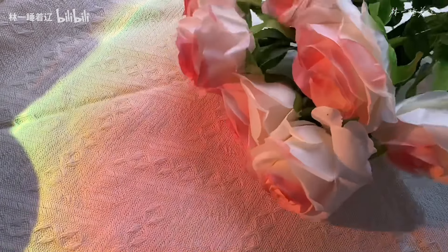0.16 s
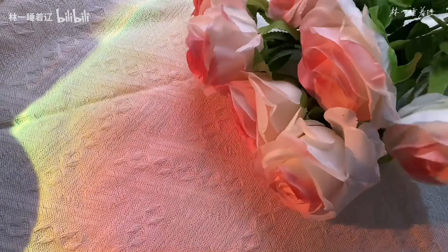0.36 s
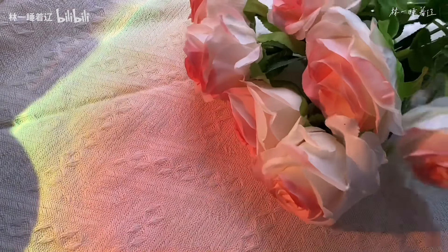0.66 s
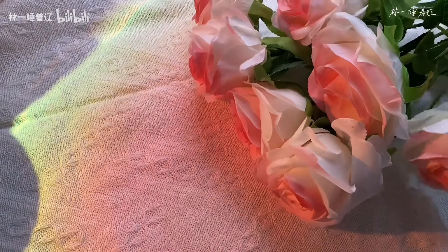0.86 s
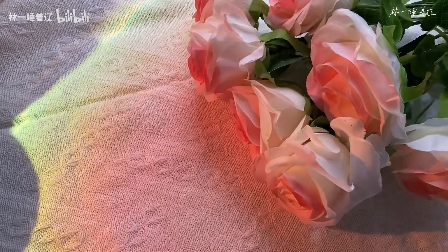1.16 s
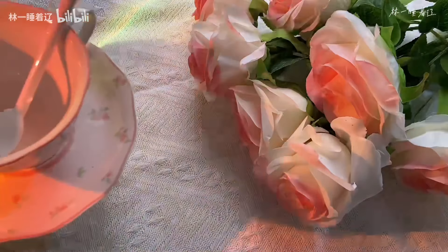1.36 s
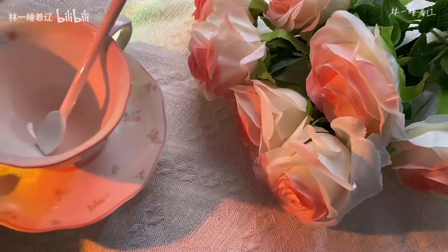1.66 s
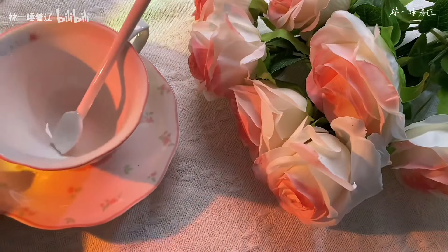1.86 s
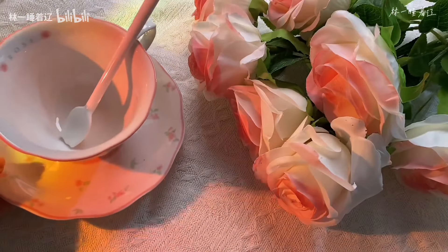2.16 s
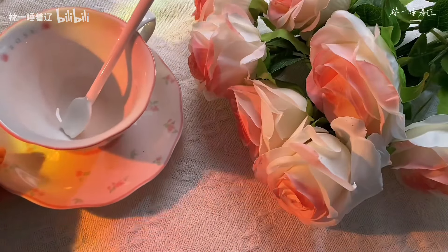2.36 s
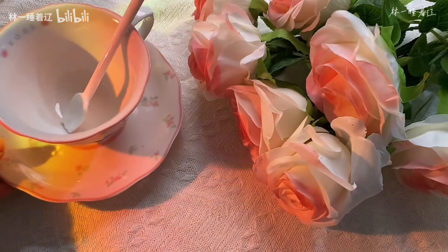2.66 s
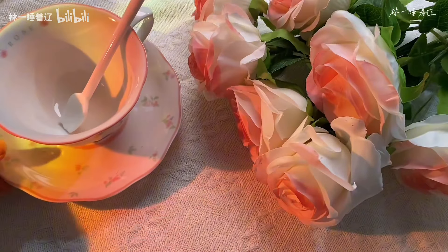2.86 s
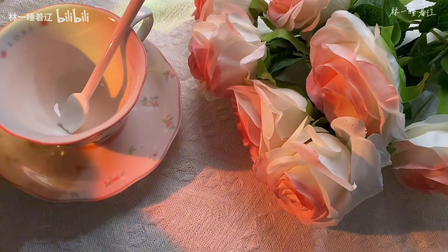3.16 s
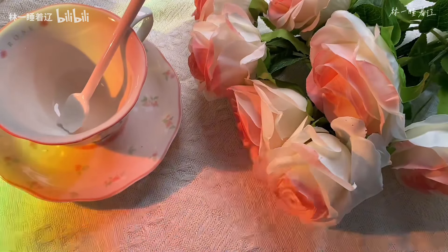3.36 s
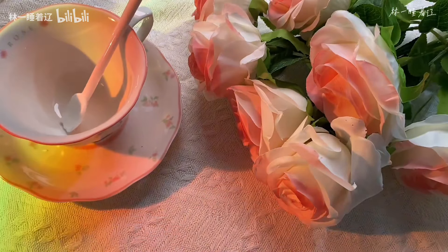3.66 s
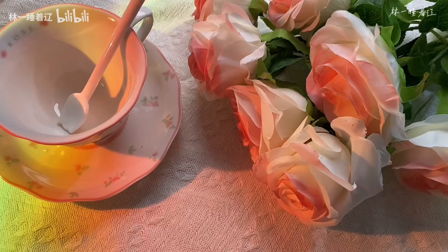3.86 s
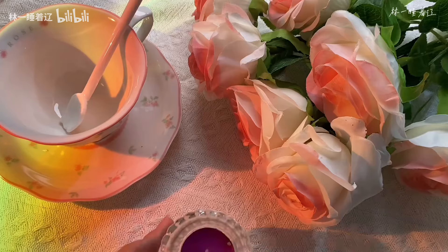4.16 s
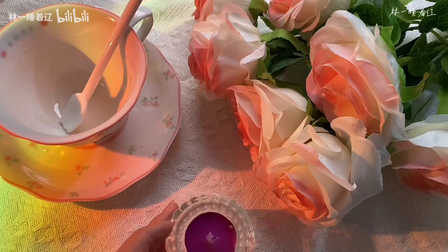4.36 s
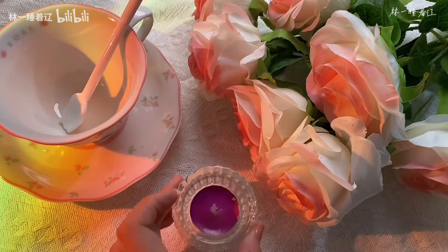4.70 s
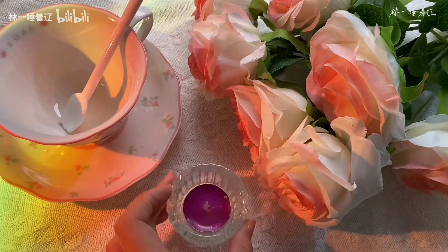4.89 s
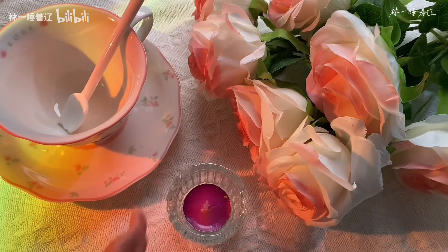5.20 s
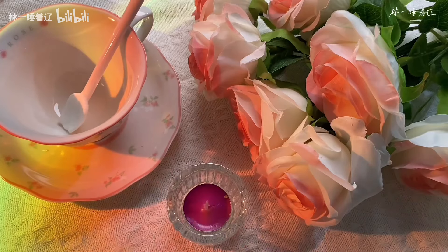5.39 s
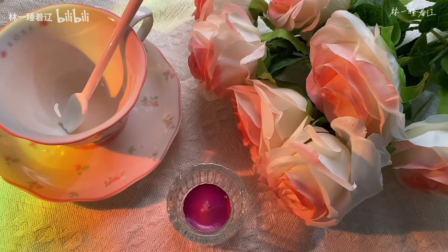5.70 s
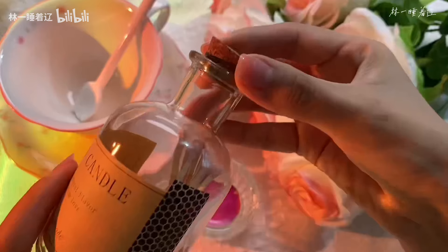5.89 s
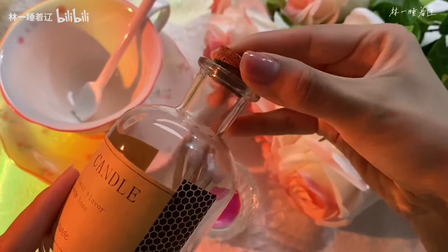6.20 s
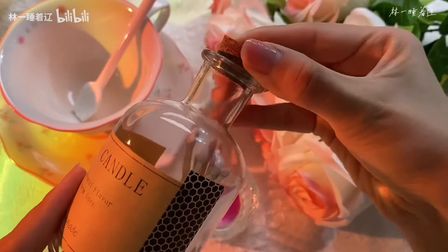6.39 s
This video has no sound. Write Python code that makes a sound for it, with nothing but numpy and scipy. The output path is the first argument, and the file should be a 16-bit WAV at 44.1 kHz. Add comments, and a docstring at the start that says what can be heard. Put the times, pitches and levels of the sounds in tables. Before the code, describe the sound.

Close to a cloth-covered table in a small quiet room, artificial roses rustle and crackle with stem snaps and soft bumps. A china saucer knocks down twice, scrapes faintly, then the cup drops sharply, rings and rattles to rest. After a pause a thick glass candle holder lands with two knocks. A fingertip thuds, a spoon tinks faintly, and soft background hiss rises at the end.

```python
"""Laying a tea table

Artificial roses rustle across a cloth, a china cup and saucer clink and rock to rest, a glass candle holder
knocks down and a fingertip taps. Blows ring banks of decaying sines, with noise bursts as their cracks;
rustle, scrapes and skids are shaped noise. The table booms under the heavier blows. The level dips briefly
four times; after the last dip the noise floor is louder and fingers rub softly on a bottle."""
import sys
import numpy as np
from scipy import signal
from scipy.fft import rfft, irfft, next_fast_len
from scipy.io import wavfile
from scipy.ndimage import uniform_filter1d, map_coordinates

SR = 44100
rng = np.random.default_rng(int(sys.argv[2]) if len(sys.argv) > 2 else 0)


def dump_mix(stems):
    """Bounce the given channels to the path in sys.argv[1] as a 16-bit WAV at rate SR."""
    frames = np.atleast_2d(stems).T  # one column per channel
    limited = np.clip(frames, -1, 1)  # hard clip at full scale
    pcm = np.round(limited * 32767).astype(np.int16)
    wavfile.write(sys.argv[1], SR, pcm)


N = 288414


def amp(db):
    """Decibels to gain."""
    return 10 ** (np.asarray(db) / 20)


def unit(x):
    """Scale to rms 1."""
    return x / np.sqrt(np.mean(x ** 2) + 1e-20)


def along(points, hz):
    """Interpolate (Hz, value) points on a log frequency axis."""
    point_hz, value = np.transpose(points)
    return np.interp(np.log(hz + 1), np.log(point_hz + 1), value)


def wobble(rate_hz):
    """Smooth random curve through normal knots at the given rate."""
    knots = rng.standard_normal(int(N * rate_hz / SR) + 4)
    return map_coordinates(knots, [np.arange(N) * rate_hz / SR])


def filtered(x, response):
    """Apply a response of frequency to x."""
    m = next_fast_len(len(x) + SR // 4)
    spectrum = rfft(x, m) * response(np.fft.rfftfreq(m, 1 / SR))
    return irfft(spectrum, m)[:len(x)]


def coloured(x, tone):
    """Weight x by a tone table, at rms 1."""
    return unit(filtered(x, lambda hz: amp(along(tone, hz))))


def noise(tone):
    """Steady noise of rms 1."""
    return coloured(rng.standard_normal(N), tone)


def add(track, start_s, sound):
    """Mix a sound into the track."""
    part = track[max(round(start_s * SR), 0):][:len(sound)]
    part += sound[:len(part)]


def swell(peak_s, db, rise_s, fall_s):
    """Gain climbing to a peak and dying away; rise and fall are times per 20 dB."""
    t = np.arange(N) / SR - peak_s
    return amp(db - 20 * np.minimum(np.maximum(-t / rise_s, t / fall_s), 10))


def swells(rows):
    """Joint gain of overlapping swells, summed in power."""
    return np.sqrt(sum(swell(*row) ** 2 for row in rows))


# Brief level dips. Each row: start in seconds, end in seconds.
DIPS = [(1.345, 1.367), (2.84, 2.895), (3.76, 3.805), (5.82, 5.905)]


def ring_end(start_s):
    """Time in seconds when a ring begun at start_s is cut: the end of the next dip, or of the sound."""
    return min([end for start, end in DIPS if end > start_s] + [N / SR])


def struck(blows, modes, pivot_hz, attack_s, detune=0):
    """Each blow rings all modes with random strength and pitch offsets; brightness tilts levels about pivot_hz."""
    hz, mode_db, t60_s = np.transpose(modes)
    out = np.zeros(N)
    t = np.arange(int(2 * t60_s.max() * SR)) / SR
    fades = amp(-60 * t / t60_s[:, None]) * (1 - np.exp(-t / attack_s)) ** 2
    for start_s, db, tilt in blows:
        extra_db, sharper = rng.standard_normal((2, len(hz)))
        mode_hz = hz * (1 + detune * sharper)
        waves = np.sin(2 * np.pi * mode_hz[:, None] * t) * fades
        ring = -amp(db + mode_db + tilt * np.log2(hz / pivot_hz) + extra_db) @ waves
        add(out, start_s, ring[:round((ring_end(start_s) - start_s) * SR)])
    return out


# Crack of a blow. Each row: frequency in Hz, density in dB per Hz.
CONTACT = [(100, -0.5), (450, 1.5), (900, 0), (2000, -6.5), (4000, -11.5), (7000, -30.5), (11000, -38),
           (16000, -60)]
BRIGHT_LIMIT_HZ = 3800  # brightness tilt is flat above this


def cracks(blows, pivot_hz, t60_s, body_db, body_t60_s, body_hz):
    """Noise burst at each contact, plus a low-passed after-ring of many crowded modes."""
    out = np.zeros(N)
    t = np.arange(SR // 4) / SR
    rise = np.minimum(t / .0004, 1)
    for start_s, db, tilt in blows:
        burst = coloured(rng.standard_normal(len(t)), CONTACT)
        burst = filtered(burst, lambda hz: amp(tilt * np.log2(np.minimum(hz, BRIGHT_LIMIT_HZ) / pivot_hz + .1)))
        body = filtered(burst, lambda hz: 1 / (1 + (hz / body_hz) ** 4))
        crack = amp(-60 * t / t60_s) * burst
        after_ring = amp(body_db) * amp(-60 * t / body_t60_s) * body
        add(out, start_s, amp(db) * rise * (crack + after_ring))
    return out


# A hand shifting things on the table. Each row: peak in seconds, level in dB, rise and fall in seconds per 20 dB.
NUDGES = [(1.405, -37, 0.052, 0.12), (1.83, -33.5, 0.027, 0.046), (2.08, -41, 0.033, 0.095),
          (2.8, -32, 0.14, 0.041), (3.02, -31.5, 0.14, 0.13), (3.23, -45.5, 0.19, 0.088),
          (4.27, -37.5, 0.054, 0.21), (5.3, -45.5, .1, 0.13), (5.77, -37.5, .1, 0.065)]
# Tones of the stirring, the hiss and the final noise floor. Each row: frequency in Hz, density in dB per Hz.
RUMBLE_TONE = [(12, -29), (20, 2.5), (41, -6.5), (70, -18.5), (260, -31.5), (700, -53.5), (1300, -120)]
HISS_TONE = [(180, -25), (300, -10), (760, -15.5), (1760, -20), (7730, -24), (11200, -25.5), (12200, -46)]
LAST_TONE = [(60, 4), (150, 1.5), (213, -7), (1090, -20.5), (2680, -23.5), (9710, -23.5), (13300, -17),
             (15800, -22)]
STIR_DB, HISS_DB, LAST_DB = -57.5, -72, -60
LAST_START_S = 5.91


def background(lumps_db=4.0):
    """Low, lumpy stirring of the table under the hand, over a noise floor that is louder at the end."""
    rumble = np.hypot(amp(STIR_DB), swells(NUDGES)) * amp(lumps_db * wobble(22)) * noise(RUMBLE_TONE)
    early = np.arange(N) < LAST_START_S * SR
    return rumble + np.where(early, amp(HISS_DB) * noise(HISS_TONE), amp(LAST_DB) * noise(LAST_TONE))


SLIDE_END_S = 1.345  # the bouquet comes to rest


def crackle(rate_hz, spread_db, life_s):
    """Tiny ticks at random times, each ringing briefly at its own pitch; scaled to about rms 1 over the slide."""
    chance = rng.random((int(rate_hz * SLIDE_END_S), 3))
    starts = (chance[:, 0] * SLIDE_END_S * SR).astype(int)
    pitch_hz = 200 + 12000 * chance[:, 1] ** 1.4
    size = amp(spread_db * np.minimum(-np.log(1 - chance[:, 2]), 3.5))
    t = np.arange(512) / SR
    envelope = np.exp(-t / life_s) * (1 - np.exp(-3 * t / life_s))
    ticks = size[:, None] * np.sin(2 * np.pi * pitch_hz[:, None] * t) * envelope
    track = np.bincount((starts[:, None] + np.arange(len(t))).ravel(), ticks.ravel(), N)
    return track / np.std(track[:starts.max()])


CATCH_RATE_HZ, CATCH_DECAY_S, CATCH_STRENGTH = 45, .0035, .8  # strength: gain over the steady rustle


def catches():
    """Gain of rms 1 that jumps whenever a petal catches, and falls back at once."""
    kicks = (rng.random(N) < CATCH_RATE_HZ / SR) * rng.uniform(.3, 1.5, N)
    t = np.arange(SR // 20) / SR
    return unit(1 + CATCH_STRENGTH * signal.fftconvolve(kicks, np.exp(-t / CATCH_DECAY_S))[:N])


def crinkled(x, depth_db):
    """Flexing petals lend passing resonances: a smoothed random gain over time and frequency."""
    z = signal.stft(x, nperseg=512)[2]
    field = uniform_filter1d(rng.standard_normal(z.shape), size=4, axis=0)
    field = uniform_filter1d(field, size=8, axis=1)
    return unit(signal.istft(z * amp(depth_db * unit(field)), nperseg=512)[1][:N])


# Pushes of the bouquet. Each row: peak in seconds, relative level in dB, rise and fall in seconds per 20 dB,
# treble offset in dB.
PUSHES = [(0, -41.5, .05, 0.054, 7.5), (0.06, -32, 0.073, 0.1, -3), (0.317, -42, 0.063, 0.022, 3),
          (0.454, -38, 0.14, 0.065, 0.5), (0.57, -40.5, 0.081, 0.16, -3), (.675, -40.5, 0.041, 0.039, -4.5),
          (.82, -41.5, 0.2, 0.33, -3), (1.072, -37, 0.052, 0.14, 0), (1.149, -38, 0.013, 0.014, 6),
          (1.186, -40, 0.04, 0.062, 2.5), (1.22, -36, 0.012, 0.016, 7), (1.313, -55.5, 0.21, 0.041, 2.5)]
# Petal rustle and stem drag. Each row: frequency in Hz, density in dB per Hz.
PETALS = [(150, -13.5), (300, 0.5), (600, -2), (1100, 2.5), (2100, 1.5), (3200, -0.5), (5000, -4),
          (8500, -9), (11300, -16), (12200, -55)]
DRAG_TONE = [(15, -44), (25, 2.5), (71, 3.5), (253, -9.5), (397, -13), (600, -20.5), (1320, -120)]
DRAG_DB, DRAG_FOLLOWS = -47, .7  # level at the median push gain; dB of drag per dB of push
# Flower heads bumping the table. Each row: start in seconds, level in dB, brightness in dB per octave.
BUMPS = [(.141, -26, 0.5), (.406, -36.5, -0.5), (.565, -34.5, 3), (.668, -27.5, 1.5), (.890, -15.5, 1.5),
         (.915, -23.5, 3), (1.022, -33.5, -4.5), (1.106, -31, -10)]
# The table under a soft bump. Each row: frequency in Hz, level in dB, t60 in seconds.
PADDED_BOARD = [(59.8, 6, 0.044), (124.4, -4.5, 0.074), (190, -3.5, 0.036), (399, -15, 0.031)]


def bouquet(smooth_db=-2.5, flutter_db=2.1, split_hz=5000, treble_db=4, rustle_db=-2, lumps_db=3):
    """With each push, fabric petals catch and let go on the cloth in a spray of tiny ticks, and the stems drag."""
    push = swells([row[:4] for row in PUSHES])
    treble_push = swells([(s, db + offset_db, rise, fall) for s, db, rise, fall, offset_db in PUSHES])
    sliding = np.arange(N) < SLIDE_END_S * SR
    ticks = crackle(rate_hz=7000, spread_db=3.2, life_s=.0009)
    friction = ticks + amp(smooth_db) * rng.standard_normal(N)
    rustle = coloured(friction * catches() * sliding, PETALS)
    rustle = crinkled(rustle, depth_db=3.0) * np.sqrt(sliding.mean())
    treble = filtered(rustle, lambda hz: 1 - 1 / (1 + (hz / split_hz) ** 4))
    rustle = (rustle - treble) * push + treble * treble_push * amp(treble_db)
    rustle *= amp(rustle_db + flutter_db * wobble(70.4))
    drag_gain = (push / np.median(push[sliding])) ** DRAG_FOLLOWS
    drag = drag_gain * amp(DRAG_DB + lumps_db * wobble(42)) * noise(DRAG_TONE)
    return (rustle + drag) * sliding + struck(BUMPS, PADDED_BOARD, pivot_hz=121.5, attack_s=0.0021)


# Stems and leaves snapping. Each row: start in seconds, level in dB, centre in Hz, t60 in seconds.
SNAPS = [(.053, -33, 553, 0.074), (.133, -41, 3560, 0.044), (.419, -39, 2580, 0.025),
         (.4385, -34, 2400, 0.073), (.4494, -26, 3100, 0.037), (.458, -29.5, 5750, 0.01),
         (.478, -33.5, 4750, 0.0086), (.5656, -36, 1390, 0.02), (.596, -36.5, 1280, 0.028),
         (.597, -41, 7400, 0.018), (.724, -33.5, 399, 0.085), (.7825, -22.5, 1930, 0.019),
         (.8698, -19, 2020, 0.043), (.871, -26, 693, .035), (.8796, -17.5, 675, 0.025),
         (.9522, -35.5, 1600, 0.036), (.9742, -38, 3370, 0.019), (1.066, -30, 4320, 0.037),
         (1.117, -35.5, 2600, 0.0098), (1.146, -29, 3460, 0.024), (1.177, -38, 3460, 0.05),
         (1.214, -33, 3660, 0.026), (1.2145, -32.5, 1000, 0.049), (1.249, -40, 4000, 0.0094)]
SLIP_RATE_HZ = 2000


def stems(sharpness=5.5, edge_hz=8200):
    """Plastic stems and leaves flick together: a click and a dying run of slips through one broad resonance."""
    out = np.zeros(N)
    t = np.arange(SR // 8) / SR
    soften = signal.butter(10, edge_hz, fs=SR, output="sos")
    for start_s, db, centre_hz, t60_s in SNAPS:
        band = lambda hz: 1 / (1 + 1j * sharpness * (hz / centre_hz - centre_hz / (hz + 1)))
        slips = (rng.random(len(t)) < SLIP_RATE_HZ / SR) * rng.standard_normal(len(t))
        slips += .2 * rng.standard_normal(len(t))
        slips[0] = 1.3  # first click
        fade = amp(-60 * t / t60_s)
        snap = unit(signal.sosfilt(soften, filtered(slips * fade, band)))
        add(out, start_s, amp(db) * np.sqrt(np.mean(fade ** 2)) * snap)
    return out


# Cup and saucer touching. Each row: start in seconds, level in dB, brightness in dB per octave.
CLINKS = [(2.383, -31, 3.5), (2.544, -37.5, -4.5), (2.586, -34.5, 5), (2.780, -42.5, -0.5),
          (2.927, -41, 1.5), (2.993, -45, 7), (3.014, -53, 6.5), (3.031, -53, 7), (3.348, -20, -2),
          (3.361, -27.5, 4), (3.379, -1.5, -1), (3.412, -21, -6), (3.448, -35, 5)]
# China modes. Each row: frequency in Hz, level in dB, t60 in seconds.
CHINA = [(558.7, -8.5, 0.037), (860, -6.5, .03), (899, -5.5, 0.071), (985, -10.5, 0.026),
         (1260, -17, 0.044), (1416, -8, 0.045), (1760, -3.5, .028), (1965, -6.5, .026),
         (2420, -13.5, 0.021), (3380, -18, .018), (3650, -19, .025), (4080, -11.5, 0.04),
         (4290, -15.5, .04), (6420, -24.5, 0.045), (6560, -28, 0.073), (9530, -35, 0.041)]


def clinks():
    """Short china modes and a crack at each touch of cup and saucer."""
    ring = struck(CLINKS, CHINA, pivot_hz=1800, attack_s=0.0014, detune=0.008)
    crack = cracks(CLINKS, pivot_hz=1800, t60_s=0.011, body_db=-6.0, body_t60_s=0.089, body_hz=2207)
    return ring + amp(-11.5) * crack


# The saucer meeting the table. Each row: start in seconds, level in dB, brightness in dB per octave.
SAUCER_KNOCKS = [(2.426, -1.5, -3.5), (2.5245, -9, -4.5), (2.544, -26, 2.5), (2.768, -33, -1),
                 (2.780, -36.5, -6.5), (2.927, -33, -1), (2.992, -35.5, -7), (3.334, -28, -2),
                 (3.348, -15, 5), (3.361, -19, 1.5), (3.369, -23.5, 0), (3.379, -18.5, 4), (3.413, -25, 2),
                 (5.691, -38.5, -4.5)]
# Cloth-damped saucer modes. Each row: frequency in Hz, level in dB, t60 in seconds.
SAUCER = [(194, -12.5, .048), (255, -14.5, 0.1), (345, -2, .04), (363, -4, 0.045), (383, -14, 0.16),
          (746, .5, 0.034), (800, -11.5, 0.027), (1203, -10.5, .03), (1312, -11, 0.044), (1710, -16, 0.025),
          (2040, -20.5, 0.046), (2580, -22, .015)]


def saucer_knocks():
    """The cloth damps the saucer's modes to a dull knock."""
    ring = struck(SAUCER_KNOCKS, SAUCER, pivot_hz=457, attack_s=0.00027, detune=0.0092)
    crack = cracks(SAUCER_KNOCKS, pivot_hz=690, t60_s=0.021, body_db=-15, body_t60_s=.1, body_hz=1990)
    return ring + amp(-16.0) * crack


# Weight landing on the table. Each row: start in seconds, level in dB, brightness in dB per octave.
THUMPS = [(2.428, -19.5, 8), (2.526, -13.5, -2), (2.768, -29, 5), (2.927, -30, 4), (2.985, -28, 2),
          (3.322, -28, -5.5), (3.360, -19, 5), (4.897, -7.5, 2), (4.963, -11, -1), (5.691, -25, -2.5),
          (5.745, -31.5, -4)]
# Low board modes. Each row: frequency in Hz, level in dB, t60 in seconds.
TABLE = [(26.4, -5, 0.39), (50.3, 1.5, 0.07), (69, -3, 0.11), (117.6, 1, 0.1), (172, -4.5, 0.089)]


def table_boom():
    """Low modes of the board, rung by weight landing on it."""
    return struck(THUMPS, TABLE, pivot_hz=56.5, attack_s=0.0012)


# The cup's bowl set ringing. Each row: start in seconds, level in dB, brightness in dB per octave.
RINGS = [(2.544, -61, 1), (3.379, -28.5, -1.5)]
# Bowl modes. Each row: frequency in Hz, level in dB, t60 in seconds.
BOWL = [(964, -10, 0.46), (1395, -11.5, .26), (1455, -11.5, .26), (1969, 2.5, .72), (2379, -13, 0.16),
        (2970, -19, .28), (3014, -20, 0.34), (4062, -19.5, .28), (4044, -15.5, .27), (4436, -14, 0.27),
        (6445, -27.5, 0.48), (9800, -29.5, .16)]


def bowl():
    """Long, clear modes of the cup's bowl."""
    return struck(RINGS, BOWL, pivot_hz=2003, attack_s=.001)


# The saucer sliding before it drops. Each row: start in seconds, length in seconds, level in dB.
SCRAPES = [(2.917, .095, -55), (3.169, 0.07, -50), (3.25, .07, -58), (3.326, .036, -39)]
# Each row: frequency in Hz, density in dB per Hz.
SCRAPE_TONE = [(150, -42), (250, -11.5), (603, -3.5), (805, -16), (1370, -13), (1850, -27), (3300, -30.5),
               (4300, -44.5), (15000, -70)]
SCRAPE_ATTACK_S, SCRAPE_RELEASE_S = 0.011, 0.032  # linear attack; release per 20 dB


def stroke(start_s, length_s, db):
    """Gain of a steady slide: attack, hold, release."""
    t = np.arange(N) / SR - start_s
    release_db = 20 * np.maximum(t - length_s, 0) / SCRAPE_RELEASE_S
    return amp(db - release_db) * np.clip(t / SCRAPE_ATTACK_S, 0, 1)


def scrape():
    """Sliding friction: uneven low-mid noise."""
    return sum(stroke(*row) for row in SCRAPES) * amp(2.8 * wobble(100)) * noise(SCRAPE_TONE)


# Thin singing tinks: one of the china as the cup and saucer shift (2.918 s), the rest of the spoon slipping
# in the cup. Each row: peak in seconds, level in dB, pitch in Hz.
TINKS = [(2.918, -55.5, 4550), (5.55, -65, 5610), (5.626, -54, 5600), (5.693, -49.5, 5640),
         (5.694, -56, 4425), (5.745, -64.5, 5800), (5.756, -57, 4440), (5.78, -64.5, 5660)]
TINK_RISE_S, TINK_FALL_S = 0.022, 0.021  # per 20 dB
OVERTONE_HZ, OVERTONE_DB = 10480, -17  # thin upper note in every tink, relative to the main one
# The spoon tipping against the cup. Each row: start in seconds, level in dB, pitch in Hz, t60 in seconds.
SPOON_TAPS = [(5.618, -53.5, 2113, 0.45), (5.691, -46.5, 1966, 0.81)]


def tinks_and_spoon_taps(waver_rad=0.79):
    """Shifting china and a slipping spoon sing in short swells; each tip of the spoon wakes one pure note."""
    t = np.arange(N) / SR
    drift = waver_rad * wobble(180)
    sing = lambda hz: np.sin(2 * np.pi * hz * t + drift)
    upper = amp(OVERTONE_DB) * sing(OVERTONE_HZ)
    out = sum(swell(s, db, TINK_RISE_S, TINK_FALL_S) * unit(sing(hz) + upper) for s, db, hz in TINKS)
    for start_s, db, hz, t60_s in SPOON_TAPS:
        age = t[:round((ring_end(start_s) - start_s) * SR)]
        add(out, start_s, amp(db - 60 * age / t60_s) * np.sin(2 * np.pi * hz * age))
    return out


# The glaze skidding as the cup slips. Each row: peak in seconds, level in dB, rise and fall in seconds per 20 dB.
SKIDS = [(3.325, -41, 0.0071, .008), (3.361, -49, 0.07, .012)]
# Each row: frequency in Hz, density in dB per Hz.
SKID_TONE = [(1500, -22.5), (3300, 3), (7000, -3), (11300, -11), (12300, -58)]


def skid():
    """Glaze friction: bright, uneven noise."""
    return swells(SKIDS) * amp(1.7 * wobble(150)) * noise(SKID_TONE)


# Glaze chatter, also used by the spoon's scratch. Each row: frequency in Hz, density in dB per Hz.
RATTLE_TONE = [(200, -2.5), (900, 1), (2400, -5), (4100, -12.5), (5000, -27), (14000, -68)]
RATTLE_PEAK_S, RATTLE_DB, RATTLE_RISE_S, RATTLE_FALL_S = 3.38, -29, 0.024, 0.026  # rise, fall per 20 dB


def rattle():
    """Many tiny, irregular contacts of glaze on glaze crowd round the cup's drop."""
    contacts = (rng.random(N) < 500 / SR) * rng.standard_normal(N)
    return swell(RATTLE_PEAK_S, RATTLE_DB, RATTLE_RISE_S, RATTLE_FALL_S) * coloured(contacts, RATTLE_TONE)


# The cup's foot on the saucer. Each row: frequency in Hz, density in dB per Hz.
ROLL_TONE = [(150, -10.5), (520, -0.5), (720, -5.5), (1000, 1.5), (1450, -4.5), (2000, -31), (9000, -75)]
ROLL_DB, ROLL_RISE_S, ROLL_FALL_S = -38.5, 0.043, 0.17  # rise, fall per 20 dB


def rolling(rough_db=3.5):
    """The cup's foot rolls round the saucer's well: uneven noise peaking at the drop and dying away."""
    fade = swell(RATTLE_PEAK_S, ROLL_DB, ROLL_RISE_S, ROLL_FALL_S)
    fade *= np.arange(N) < ring_end(RATTLE_PEAK_S) * SR
    return fade * amp(rough_db * wobble(60)) * noise(ROLL_TONE)


# The cup rebounding and rocking to rest. Each row: start in seconds, level in dB, pitch in Hz.
BOUNCES = [(3.391, -10, 937), (3.412, -9, 885), (3.447, -3, 960), (3.47, -18, 917), (3.536, -12, 983),
           (3.556, -26, 960), (3.625, -32, 994), (3.709, -42.5, 1006)]
# Glaze chattering on glaze. Each row: frequency in Hz, density in dB per Hz.
BUZZ = [(150, -0.5), (900, 7.5), (1500, -1), (2600, -24.5), (12000, -72)]


def rebounds(t60_s=0.032, attack_s=0.0074, buzz_db=-19, buzz_t60_s=0.054):
    """The cup drops back softly on the saucer: each touch is one short note with a buzz of glaze on glaze."""
    out = np.zeros(N)
    t = np.arange(SR // 4) / SR
    for start_s, db, hz in BOUNCES:
        note = amp(-60 * t / t60_s) * np.sin(2 * np.pi * hz * t)
        buzz = amp(buzz_db - 60 * t / buzz_t60_s) * coloured(rng.standard_normal(len(t)), BUZZ)
        add(out, start_s, amp(db) * (1 - np.exp(-t / attack_s)) * (note + buzz))
    return out


# The saucer's foot on the cloth. Each row: start in seconds, level in dB, brightness in dB per octave.
FOOTFALLS = [(3.466, -29.5, 11), (3.549, -27.5, 9.5), (3.63, -30.5, 5.5), (3.711, -31.5, 6.5)]
# Foot modes. Each row: frequency in Hz, level in dB, t60 in seconds.
FOOT = [(109.5, 0, 0.089), (125.7, 5, 0.058), (345, -26.5, 0.047), (557, -21, 0.057)]


def footfalls():
    """The saucer's foot thuds along on the cloth in low, short modes."""
    return struck(FOOTFALLS, FOOT, pivot_hz=117.0, attack_s=0.0034, detune=0.027)


# The candle holder meeting the table. Each row: start in seconds, level in dB, brightness in dB per octave.
GLASS_KNOCKS = [(4.890, -25, 2), (4.8955, -3.5, 3.5), (4.9615, -12, -0.5)]
# Thick glass modes. Each row: frequency in Hz, level in dB, t60 in seconds.
GLASS = [(214, -14, 0.16), (396.4, -10.5, 0.092), (469, 3, 0.067), (485, -5, .04), (625, -14, 0.078),
         (726.5, -3.5, 0.067), (905, -13.5, .06), (1237, -16, 0.044), (1380, -25, 0.055),
         (1926, -23, 0.023), (2580, -19.5, .023)]


def candle_holder():
    """Thick glass lands on one edge, then flat; through the cloth its modes die fast, as a knock."""
    body = struck(GLASS_KNOCKS, GLASS, pivot_hz=466, attack_s=0.00024, detune=0.0093)
    crack = cracks(GLASS_KNOCKS, pivot_hz=614, t60_s=0.012, body_db=-16.5, body_t60_s=0.44, body_hz=1020)
    return body + amp(-13.5) * crack


# A fingertip knocking as the hand lets go. Each row: start in seconds, level in dB, brightness in dB per octave.
TAPS = [(5.386, -30.5, -0.5), (5.3917, -11.5, -0.5)]
# Thud modes. Each row: frequency in Hz, level in dB, t60 in seconds.
FINGER = [(45.3, -17, 0.15), (66.6, 2.5, 0.096), (117, -15, 0.13), (182.7, -15, 0.099), (300, -8, 0.048),
          (710, -22, 0.034), (1295, -15, 0.029), (1416, -1.5, 0.013), (1890, -11.5, 0.021),
          (3220, -14.5, 0.0099)]


def fingertip():
    """A soft, dead thud with a light tick at its front."""
    thud = struck(TAPS, FINGER, pivot_hz=70.5, attack_s=0.0011)
    tick = cracks(TAPS, pivot_hz=490, t60_s=0.032, body_db=-1.5, body_t60_s=0.081, body_hz=2220)
    return thud + amp(-21.5) * tick


# The spoon's own short ring. Each row: frequency in Hz, level in dB, t60 in seconds.
SPOON = [(762, -3, .05), (3680, -9.5, .06)]


def spoon_scratch(scratch_db=-9, rise_s=0.0061, fall_s=0.0343):
    """Each tap rings the spoon briefly and scratches the glaze."""
    ring = struck([(s, db, 0) for s, db, hz, t60_s in SPOON_TAPS], SPOON, pivot_hz=1, attack_s=.001)
    scratch = swells([(s, db + scratch_db, rise_s, fall_s) for s, db, hz, t60_s in SPOON_TAPS])
    return ring + scratch * noise(RATTLE_TONE)


# Fingers on glass. Each row: frequency in Hz, density in dB per Hz.
GRIP_TONE = [(100, -11), (260, 7), (700, -3), (5000, -11), (10000, -19)]
GRIP_PEAK_S, GRIP_DB, GRIP_RISE_S, GRIP_FALL_S = 6.0, -63, 0.45, 0.74  # rise, fall per 20 dB


def bottle():
    """Fingers rub softly on the glass bottle: a swell of noise at the end."""
    grip = swell(GRIP_PEAK_S, GRIP_DB, GRIP_RISE_S, GRIP_FALL_S) * noise(GRIP_TONE)
    return grip * (np.arange(N) >= LAST_START_S * SR)


# Room decay. Each row: frequency in Hz, t60 in seconds.
ROOM = [(100, .6), (450, .36), (1200, 0.26), (3000, .2), (10000, .042)]
# Room response. Each row: frequency in Hz, gain in dB.
ROOM_TONE = [(100, 0), (450, -5), (750, -5.5), (1100, 3), (2000, -6.5), (6000, -9.5)]


def room(x):
    """A small furnished room: decaying noise as the echo, its treble soaked up first."""
    hz, t, z = signal.stft(rng.standard_normal(SR // 2), SR, nperseg=512)
    tail = signal.istft(z * amp(-60 * t / along(ROOM, hz)[:, None]), SR, nperseg=512)[1]
    wet = signal.fftconvolve(x, tail / np.linalg.norm(tail))[:N]
    return filtered(wet, lambda hz: amp(along(ROOM_TONE, hz)))


def teacup():
    """The cup, saucer and spoon together."""
    blows = clinks() + saucer_knocks() + bowl() + rebounds() + footfalls()
    friction = scrape() + skid() + rattle() + rolling()
    return blows + friction + tinks_and_spoon_taps() + spoon_scratch()


def scene():
    """The things on the table sound into the room; the dull blows reach the microphone through the board."""
    things = bouquet() + stems() + teacup() + candle_holder() + bottle()
    boom = table_boom() + fingertip()
    return (things + boom + amp(-20.0) * room(things) + background())[None]


TOP_HZ = 16200


def record(dry):
    """The level dips by up to 30 dB, the hardest knocks clip softly, and the top is cut off."""
    t = np.arange(N) / SR
    dipped = sum((t > start) & (t < end) for start, end in DIPS)
    x = dry[0] * amp(-30 * uniform_filter1d(dipped.astype(float), size=700))
    x = x / (1 + np.abs(x) ** 12) ** (1 / 12)
    return filtered(x, lambda hz: hz < TOP_HZ)[None]


dry = scene()
out = record(dry)
dump_mix(out)
```